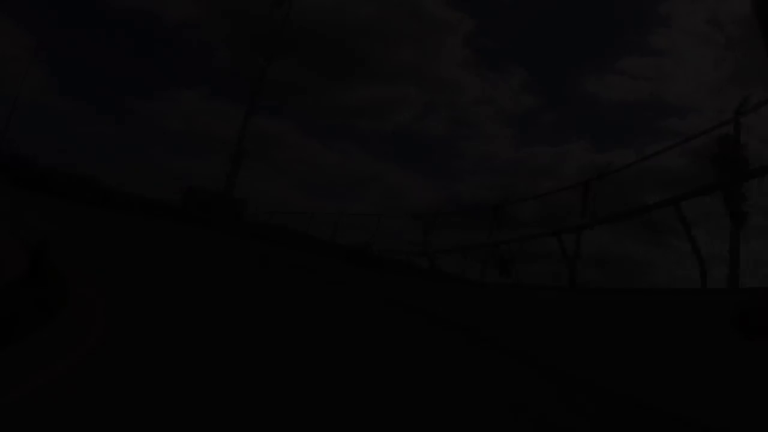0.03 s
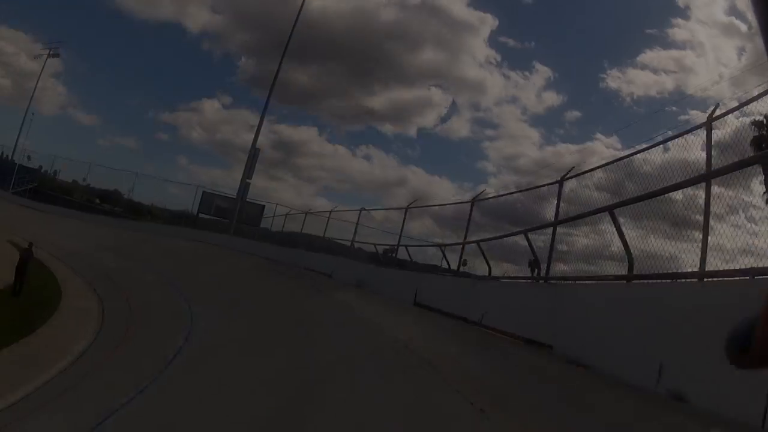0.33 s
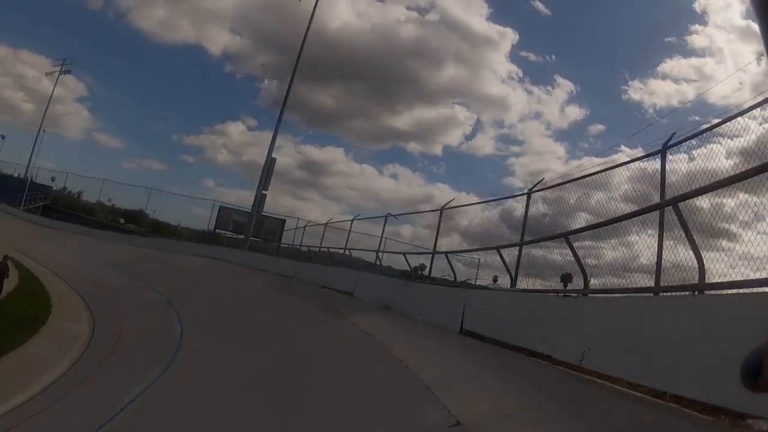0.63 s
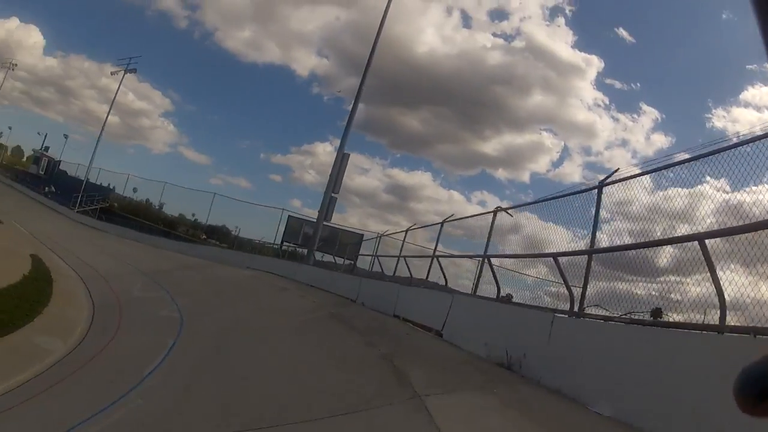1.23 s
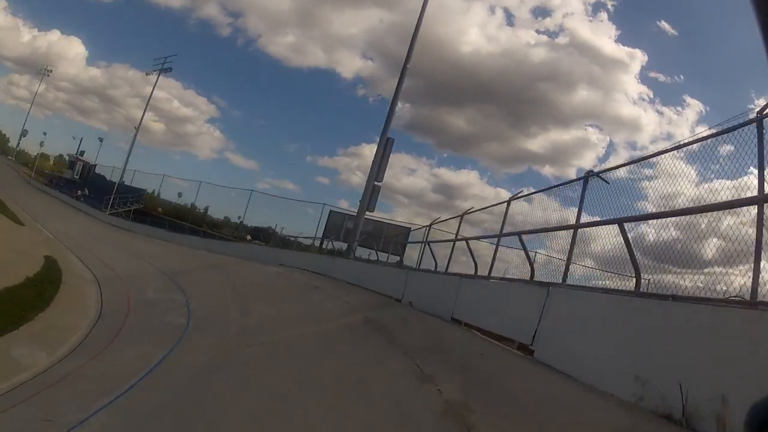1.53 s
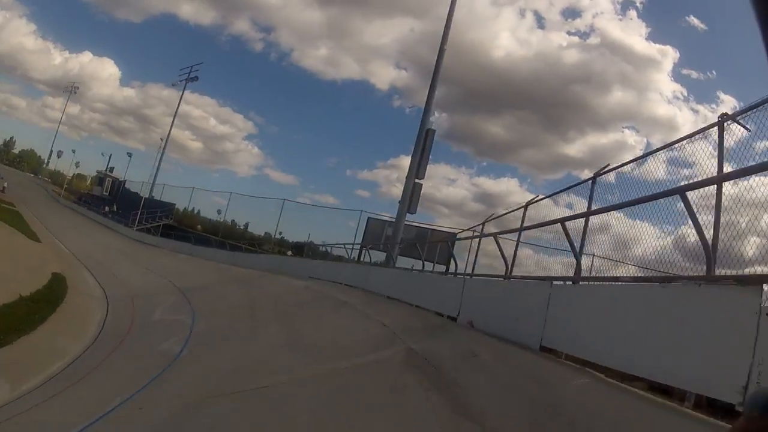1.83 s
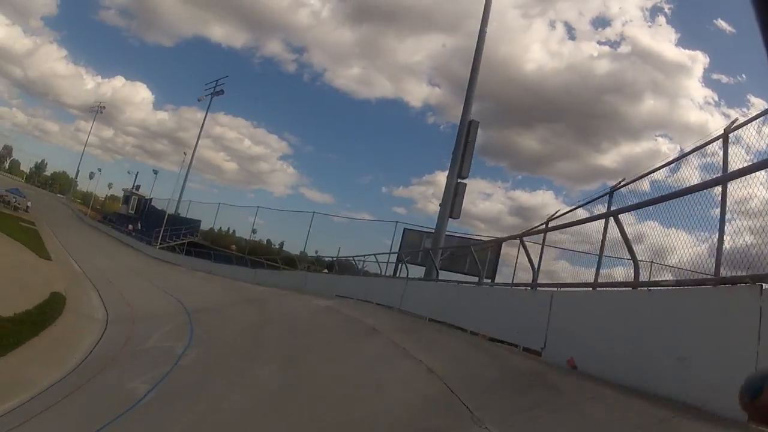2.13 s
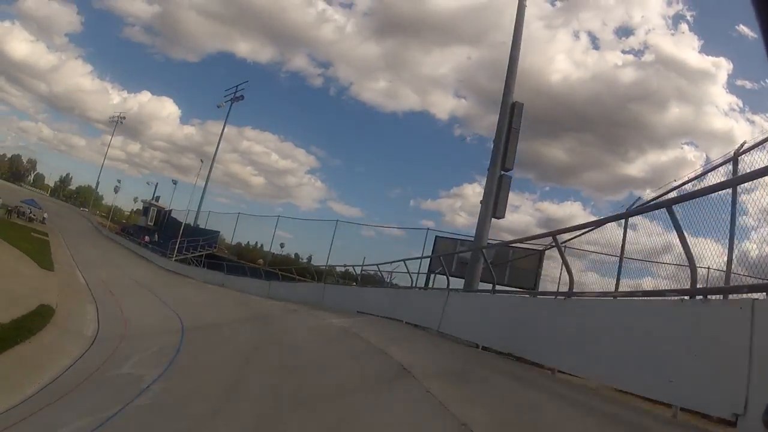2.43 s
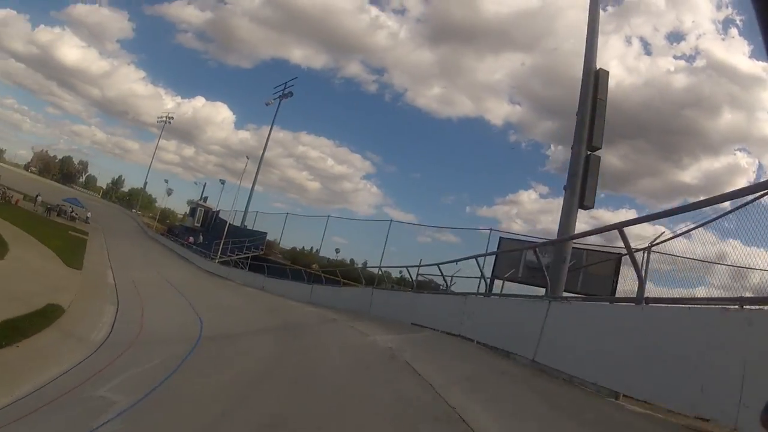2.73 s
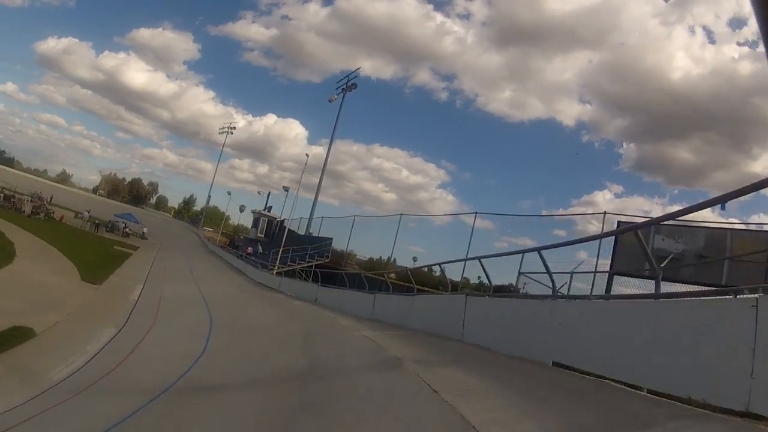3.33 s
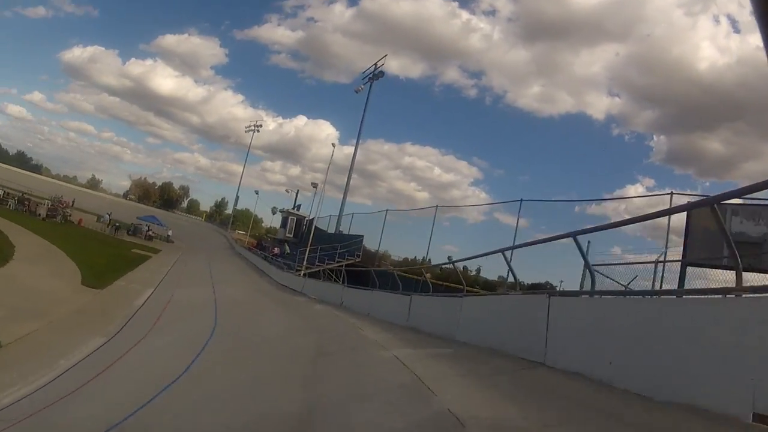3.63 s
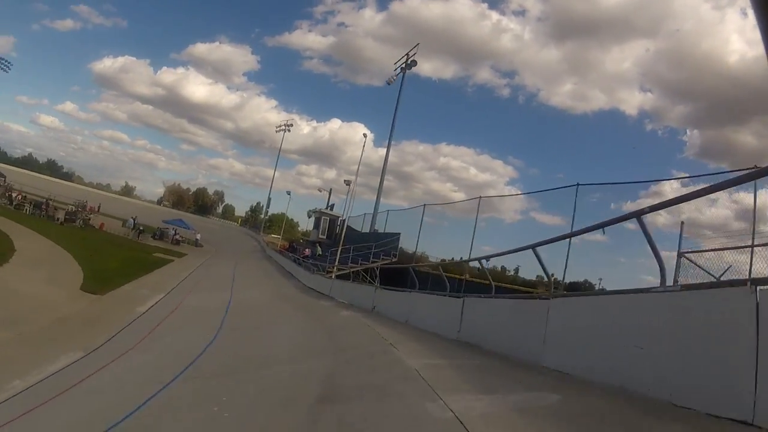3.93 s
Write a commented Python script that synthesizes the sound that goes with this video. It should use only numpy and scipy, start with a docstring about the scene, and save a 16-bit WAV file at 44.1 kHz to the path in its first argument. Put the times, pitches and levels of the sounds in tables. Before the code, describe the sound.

Droning hum of a bicycle riding a concrete track, with wind rumble and faint ticks.

```python
"""A concrete track, heard from a camera in a case fixed to a rolling bicycle; the sound fades in.
The rough surface makes frame and case drone in their resonances over tyre noise, and wind rumbles
on the case. The loose mount ticks and buzzes, and bumps rock the camera. The mono recorder holds
each sample at a low rate, which mirrors the sound into a thin fizz in the treble."""
import sys
import numpy as np
from scipy import signal
from scipy.fft import rfft, irfft
from scipy.io import wavfile

SR = 44100
rng = np.random.default_rng(int(sys.argv[2]) if len(sys.argv) > 2 else 0)


def digitize_waveform(pressure):
    """Quantize a signal to 16-bit integers and store it at the path in sys.argv[1].

    Rows of a 2-D input are taken as channels; values are limited to [-1, 1].
    """
    field = np.atleast_2d(pressure).T
    bounded = np.clip(field, -1, 1)
    quanta = np.round(bounded * 32767).astype(np.int16)
    wavfile.write(sys.argv[1], SR, quanta)


N = 176400
TIME_S = np.arange(N) / SR


def from_db(db):
    """Decibels to gain."""
    return 10 ** (np.asarray(db) / 20)


def unit_rms(x):
    """Scale to rms 1."""
    return x / np.sqrt(np.mean(x ** 2) + 1e-20)


def curve(rows, at_s=TIME_S):
    """Interpolate (seconds, value) rows."""
    return np.interp(at_s, *np.transpose(rows))


def drift(rate_hz):
    """Smooth random wander, rms 1, mostly below rate_hz."""
    pole = np.exp(-2 * np.pi * rate_hz / SR)
    wander = signal.lfilter([1], [1, -2 * pole, pole * pole], rng.standard_normal(N + SR))
    return unit_rms(wander[SR:])


def coloured_noise(spectrum):
    """Noise shaped by (Hz, dB) rows, rms 1."""
    hz, db = np.transpose(spectrum)
    bins_hz = np.maximum(np.arange(N // 2 + 1) * SR / N, 1)
    gain = from_db(np.interp(np.log(bins_hz), np.log(hz), db, right=-np.inf))
    return unit_rms(irfft(rfft(rng.standard_normal(N)) * gain, N))


def resonate(x, hz, width_hz):
    """Steep resonance: two band-passes in series, each width_hz wide; white noise keeps its level."""
    radius, angle = np.exp(-np.pi * width_hz / SR), 2 * np.pi * hz / SR
    gain = (1 - radius ** 2) / 2
    stage = [gain, 0, -gain, 1, -2 * radius * np.cos(angle), radius ** 2]
    return signal.sosfilt([stage, stage], x + 1e-18) * np.sqrt(2 * SR / (np.pi * width_hz))


def ring(clicks, hz, width_hz):
    """A unit click starts a decaying sine of height 1."""
    radius, angle = np.exp(-np.pi * width_hz / SR), 2 * np.pi * hz / SR
    feedback = [1, -2 * radius * np.cos(angle), radius ** 2]
    return signal.lfilter([0, np.sin(angle)], feedback, clicks + 1e-18)


def click_train(rows):
    """One click per (seconds, dB) row."""
    start_s, db = np.transpose(rows)
    return np.bincount((start_s * SR).astype(int), from_db(db), N)[:N]


# Shaking by the track. Each row: time in seconds, level in dB.
SHAKE_DB = [(.8, -16), (1.08, -18), (1.35, -16), (1.48, -16), (1.57, -20), (1.7, -16.5), (1.8, -16.5),
            (1.92, -15.5), (2.3, -19.5), (2.6, -18), (2.87, -15.5), (3.1, -20), (3.26, -18), (3.33, -18.5),
            (3.5, -17.5), (3.8, -21), (3.89, -18.5), (4, -20.5)]
# Resonances of frame and case. Each row: frequency in Hz, width in Hz, relative level in dB.
BODY_MODES = [(413, 24.5, -10), (449, 28, -15), (485.3, 27, -6.5), (531.5, 71, -8), (601.7, 28, -13.5),
              (658.6, 51, -10), (730.3, 56, -12), (779.5, 50.5, -9.5), (803.7, 34, -16),
              (959.4, 26.4, -18.5), (1104, 106, -17.5), (1178, 80, -23), (1527, 62, -27), (2900, 250, -22)]
# Tyre noise. Each row: frequency in Hz, relative spectral density in dB.
TYRE_SPECTRUM = [(200, -7.5), (400, 0), (700, -0.5), (900, -5), (1300, -15), (1480, -10.5), (1700, -19),
                 (2200, -17.5), (3200, -28), (4000, -25), (5000, -28), (5800, -32.5)]


def rolling(drone_db=-0.5, tyre_db=-10.5, grain_db=2.24, grain_hz=59):
    """The grain of the concrete shakes the resonances of frame and case, over broad tyre noise."""
    shake = from_db(curve(SHAKE_DB) + grain_db * drift(grain_hz))
    drone = sum(from_db(db) * resonate(shake * rng.standard_normal(N), hz, width_hz)
                for hz, width_hz, db in BODY_MODES)
    tyre = shake * coloured_noise(TYRE_SPECTRUM)
    return from_db(drone_db) * drone + from_db(tyre_db) * tyre


# Wind strength. Each row: time in seconds, relative level in dB.
WIND_CURVE_DB = [(.6, -22), (.82, -23.5), (.96, -23.5), (1.07, -29), (1.24, -20.5), (1.48, -22.5),
                 (1.58, -18), (1.7, -20.5), (1.78, -20.5), (2.1, -22), (2.36, -25), (2.47, -20),
                 (2.6, -25.5), (2.97, -23), (3.4, -23), (3.6, -20.5), (3.78, -25), (3.87, -22.5)]
# Wind rumble. Each row: frequency in Hz, relative spectral density in dB.
WIND_SPECTRUM = [(12, -17), (22, -2), (40, -0.5), (52, -3.5), (62, 8), (80, -0.5), (130, 0), (200, -3.5),
                 (300, -7.5), (380, -17.5), (600, -5.5)]


def wind(gain_db=1, gust_db=1.5, gust_hz=26):
    """Gusting air makes a lumpy rumble on the case."""
    level_db = gain_db + curve(WIND_CURVE_DB) + gust_db * drift(gust_hz)
    return from_db(level_db) * coloured_noise(WIND_SPECTRUM)


# Looseness of the mount. Each row: time in seconds, relative rattle level in dB.
LOOSENESS_DB = [(.4, -36), (.7, -40.5), (.82, -33.5), (1.08, -35), (1.27, -36.5), (1.45, -40), (1.77, -39),
                (1.98, -43), (2.43, -36), (2.74, -36), (2.8, -45), (2.92, -52), (2.96, -34.5),
                (3.08, -41.5), (3.19, -34.5), (3.52, -47.5), (3.59, -38.5), (3.82, -35.5), (3.95, -38)]


def rattle(rate_per_s, gain_db, jitter=0.55, spread_db=5):
    """An uneven run of faint clicks, as strong as the mount is loose."""
    chance = rng.uniform(-1, 1, (1000, 3))
    start_s = np.cumsum(1 + jitter * chance[:, 0]) / rate_per_s
    scatter_db = spread_db * (chance[:, 1] + chance[:, 2])
    level_db = gain_db + curve(LOOSENESS_DB, start_s) + scatter_db
    return click_train(np.column_stack([start_s, level_db])[start_s < N / SR])


# Distinct ticks. Each row: start in seconds, relative level in dB.
TICK_HITS = [(.4775, -8), (.5845, -7), (.5987, -5.5), (.6268, -6.5), (.7097, -12), (.8010, -5.5),
             (.8291, -6.5), (1.0162, -2.5), (1.0250, -9), (1.1861, -20), (1.3381, -13), (1.3809, -7.5),
             (1.6454, -12), (1.6522, -8), (1.7858, -2), (2.4982, -23), (2.6720, -18), (2.7176, -8),
             (3.0334, -21), (3.1219, -11.5), (3.1831, -8.5)]
# Ring of a tick. Each row: frequency in Hz, width in Hz, relative level in dB.
TICK_RESONANCES = [(3060, 510, 3), (3850, 940, 8), (4440, 2700, 1.5)]


def mount_ticks(gain_db=-5):
    """Single hard contacts of plastic, gone in about a millisecond."""
    clicks = click_train(TICK_HITS) + rattle(rate_per_s=32, gain_db=9)
    return sum((-1) ** k * from_db(gain_db + db) * ring(clicks, hz, width_hz)
               for k, (hz, width_hz, db) in enumerate(TICK_RESONANCES))


# Distinct buzzes. Each row: start in seconds, relative level in dB.
BUZZ_SLIPS = [(.5558, -13.5), (.7302, -11), (.8115, -11), (.8924, -19), (.9248, -40), (.9557, -24),
              (.9743, -13), (1.0083, -13), (1.0372, -8), (1.0392, -23), (1.0498, -12), (1.0596, -11.5),
              (1.0935, -18), (1.1438, -20), (1.1620, -13.5), (1.1990, -23), (1.2482, -21), (1.2670, -24),
              (1.5375, -10), (1.5498, -11), (1.7145, -22), (1.7324, -14.5), (1.7476, -7), (1.7500, -19),
              (1.8492, -14), (2.0414, -13), (2.1690, -20), (2.2028, -16.5), (2.2900, -12.5), (2.3240, -15),
              (2.3986, -11.5), (2.4143, -18), (2.4326, -13), (2.4851, -13.5), (2.6122, -16), (2.7562, -15),
              (2.9535, -12), (2.9658, -28), (3.1778, -16), (3.2544, -24), (3.2688, -24), (3.5914, -13),
              (3.6028, -15), (3.9183, -14), (3.9338, -11), (3.9529, -13)]
# Ring of a buzz. Each row: frequency in Hz, width in Hz, relative level in dB.
BUZZ_RESONANCES = [(1144, 490, -6.5), (2611, 700, -1), (3450, 1170, -5), (4790, 660, -4.5),
                   (5710, 1400, -16.5)]


def mount_buzzes(gain_db=-3.5, attack_s=0.00095, decay_s=0.002):
    """The mount slips and chatters for a few milliseconds at a time."""
    clicks = click_train(BUZZ_SLIPS) + rattle(rate_per_s=85, gain_db=16)
    age_s = TIME_S[:SR // 20]
    envelope = (1 - np.exp(-age_s / attack_s)) * np.exp(-age_s / decay_s)
    slip = signal.fftconvolve(clicks, envelope)[:N]
    return sum(from_db(gain_db + db) * resonate(slip * rng.standard_normal(N), hz, width_hz)
               for hz, width_hz, db in BUZZ_RESONANCES)


# Bumps. Each row: start in seconds, level in dB.
BUMP_HITS = [(1.016, -16), (1.036, -11), (1.386, -12)]


def bumps():
    """Each bump rocks the camera on its mount for a few cycles."""
    return ring(click_train(BUMP_HITS), hz=63.7, width_hz=9.6)


def scene():
    """One microphone inside the case, the same on both channels."""
    mono = rolling() + wind() + mount_ticks() + mount_buzzes() + bumps()
    return np.tile(mono, (2, 1))


def hold_fizz(x, hold_hz=12011):
    """Holding samples mirrors the sound about the hold rate."""
    mirrored_steps = np.diff(x, prepend=0) * 2 * np.cos(2 * np.pi * hold_hz * TIME_S)
    high_pass = signal.butter(2, hold_hz / 10, "high", fs=SR, output="sos")
    return signal.sosfilt(high_pass, np.cumsum(mirrored_steps, axis=1))


def record(dry, input_edge_hz=5620, fade_start_s=0.094, fade_s=0.74, cutoff_hz=15400):
    """Band-limit the input, add the fizz, fade in and cut the top."""
    limited = signal.sosfilt(signal.butter(8, input_edge_hz, fs=SR, output="sos"), dry)
    fade = np.clip((TIME_S - fade_start_s) / fade_s, 0, 1) ** 1.8
    top_cut = signal.ellip(10, 0.1, 70, cutoff_hz, fs=SR, output="sos")
    return signal.sosfiltfilt(top_cut, fade * (limited + hold_fizz(limited)))


dry = scene()
out = record(dry)
digitize_waveform(out)
```